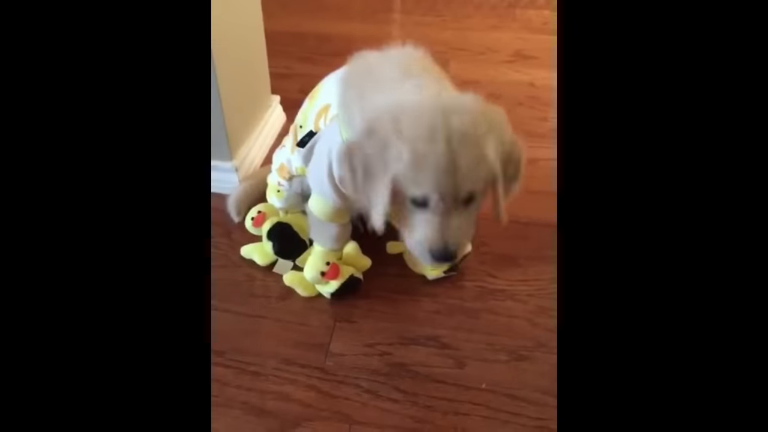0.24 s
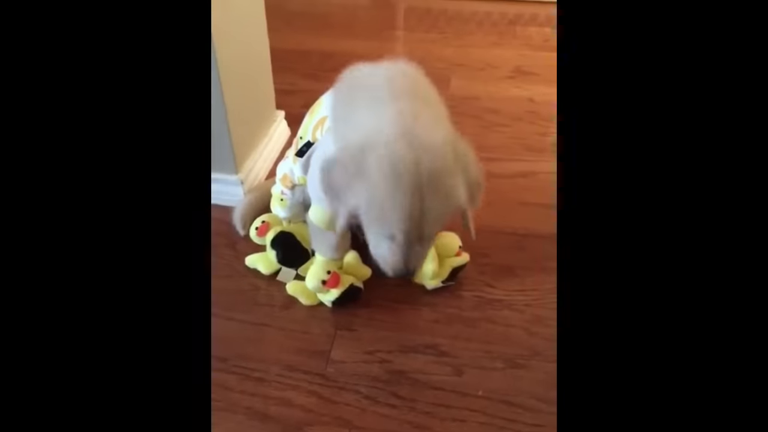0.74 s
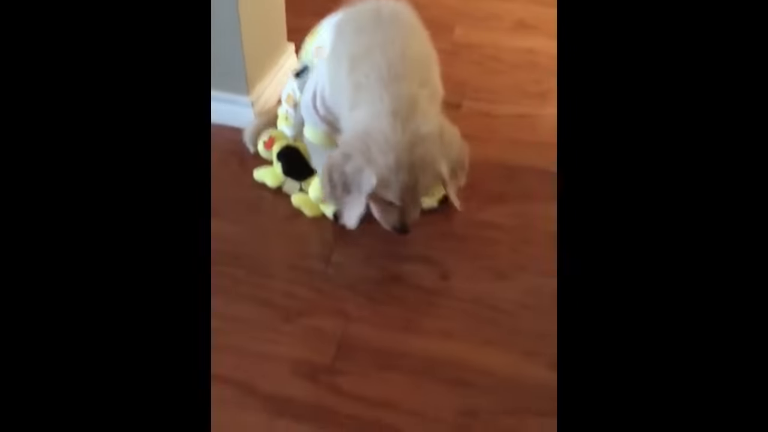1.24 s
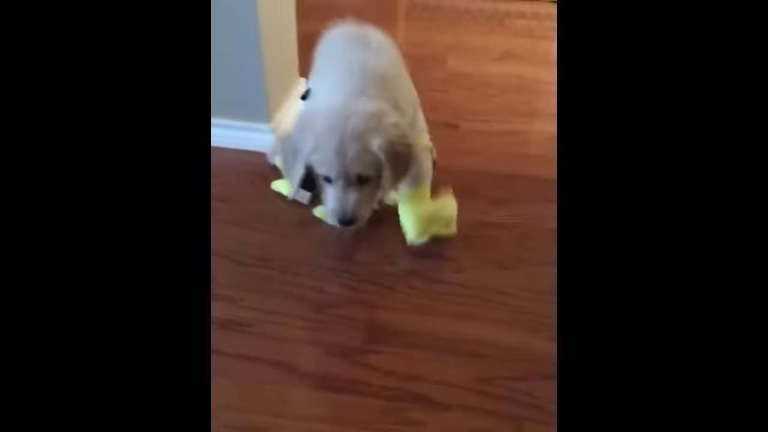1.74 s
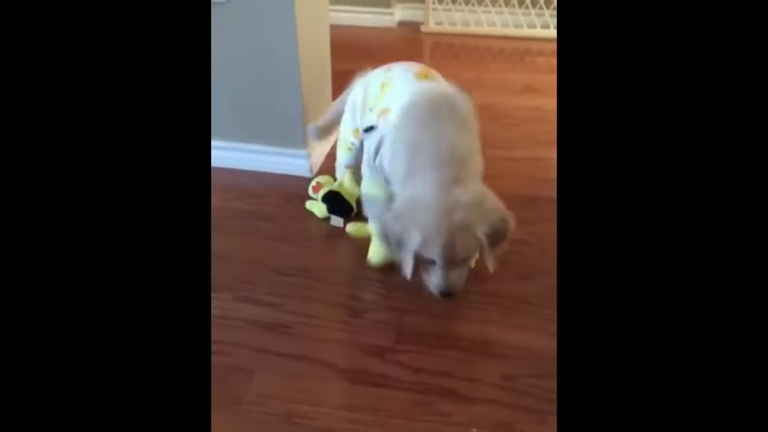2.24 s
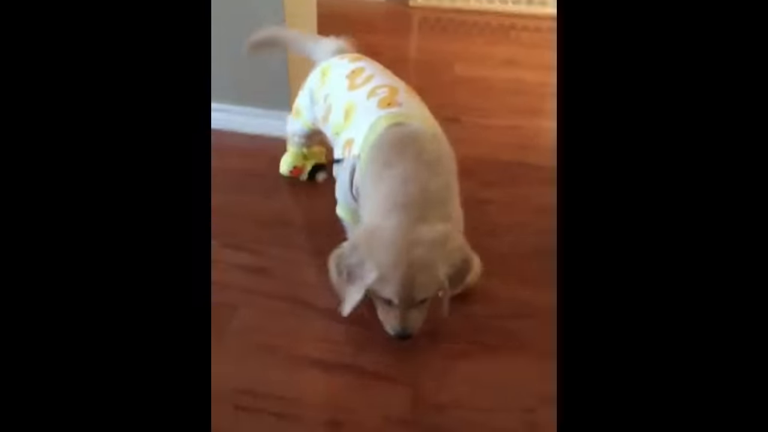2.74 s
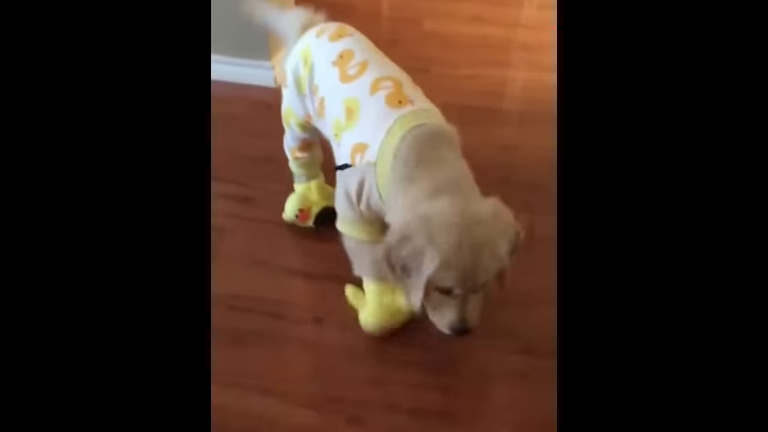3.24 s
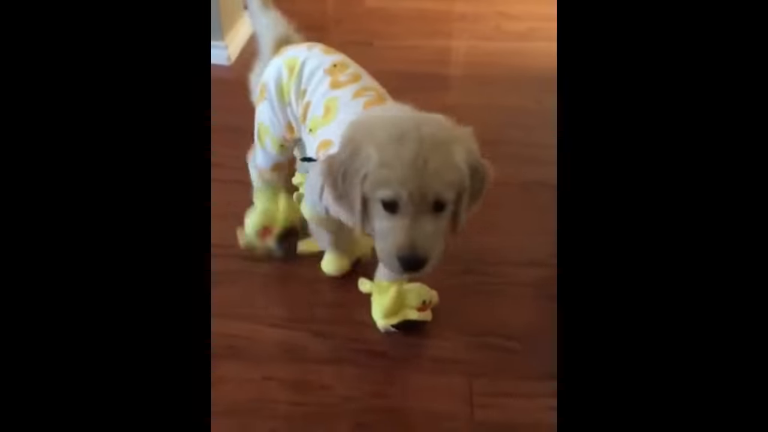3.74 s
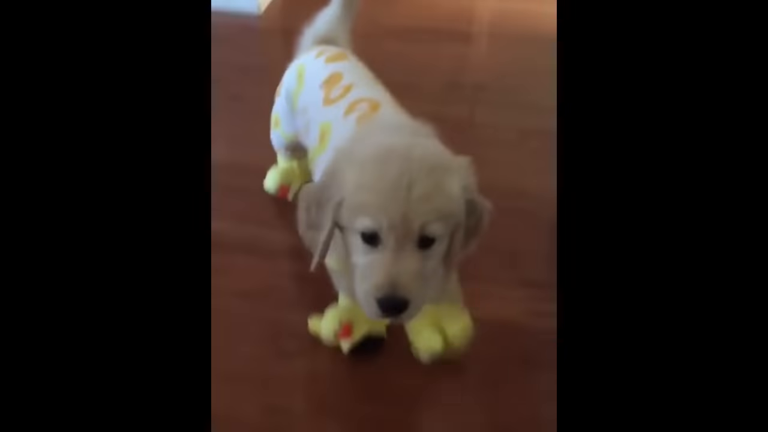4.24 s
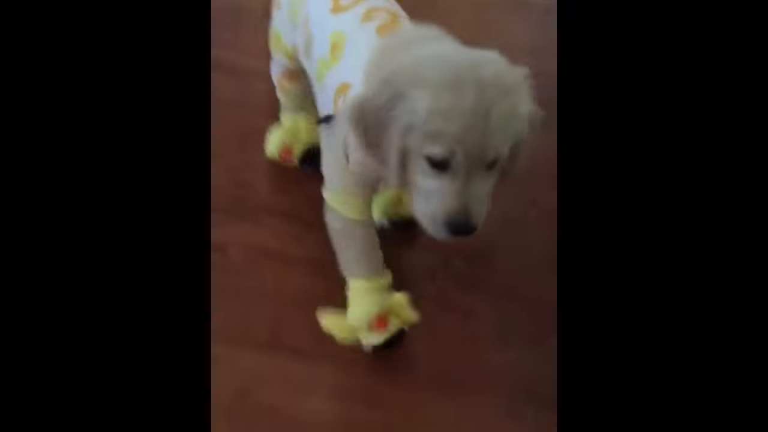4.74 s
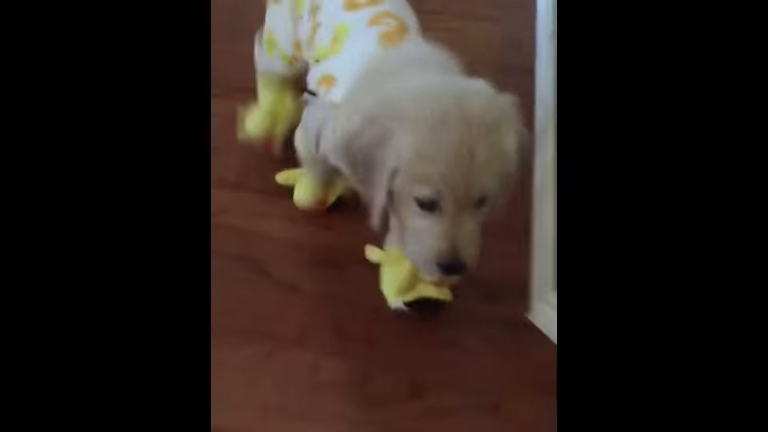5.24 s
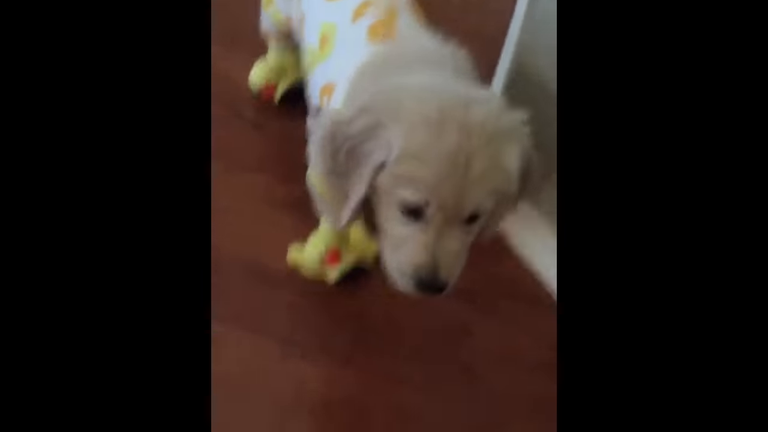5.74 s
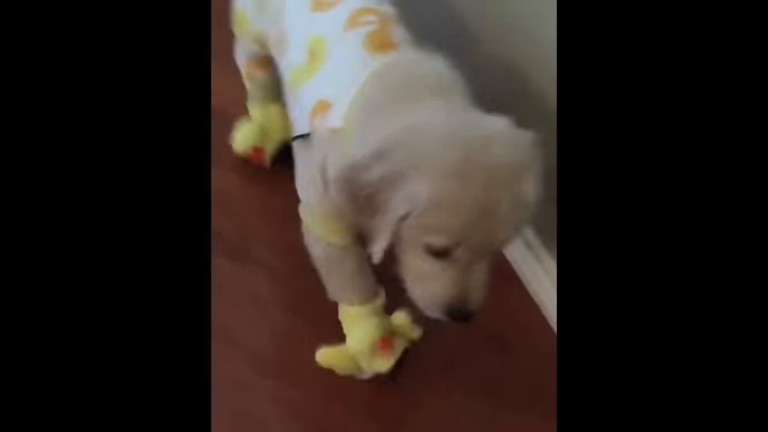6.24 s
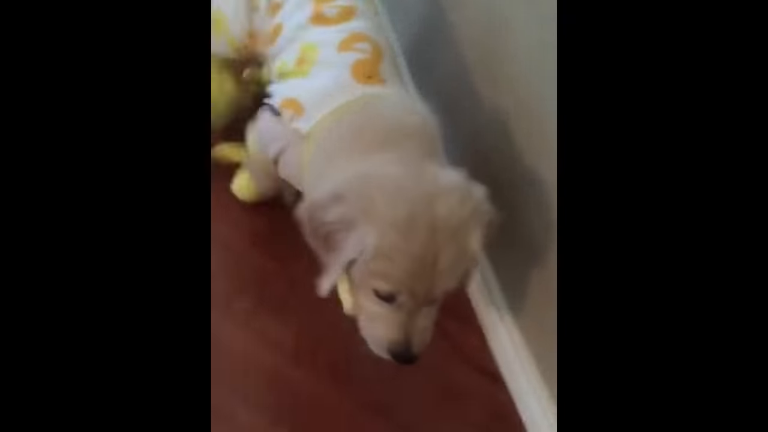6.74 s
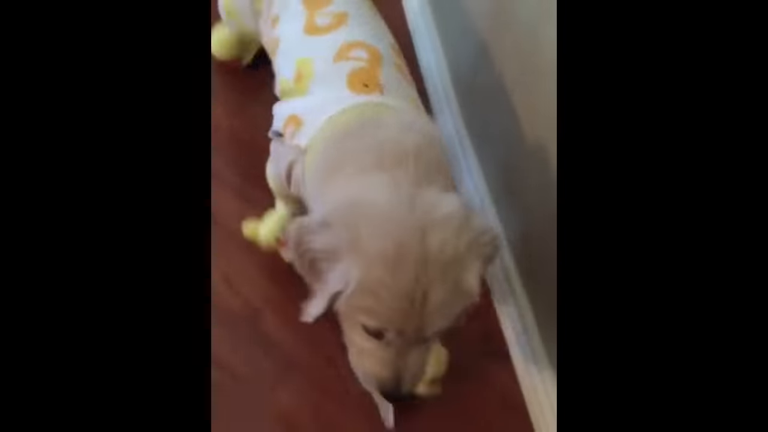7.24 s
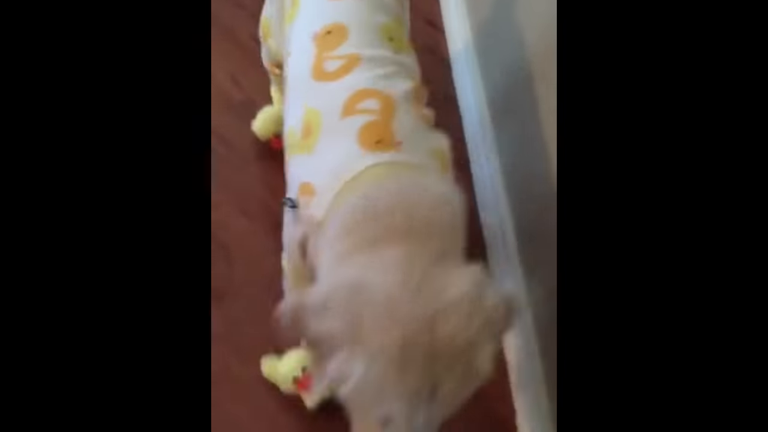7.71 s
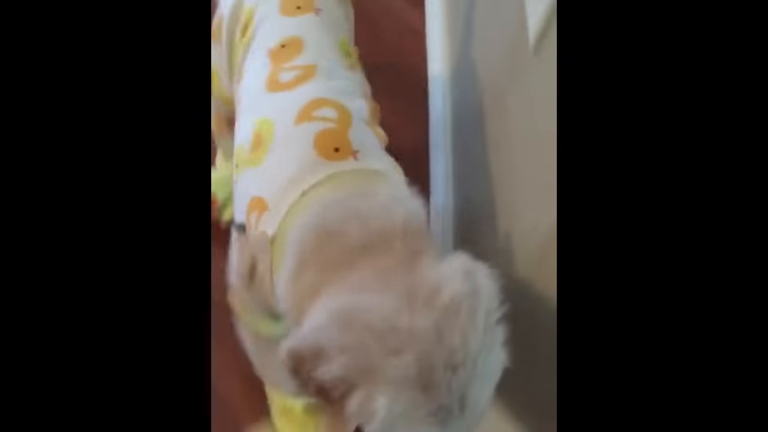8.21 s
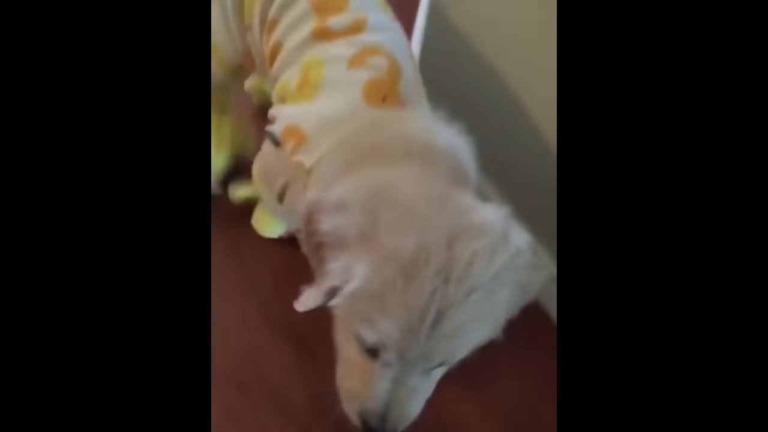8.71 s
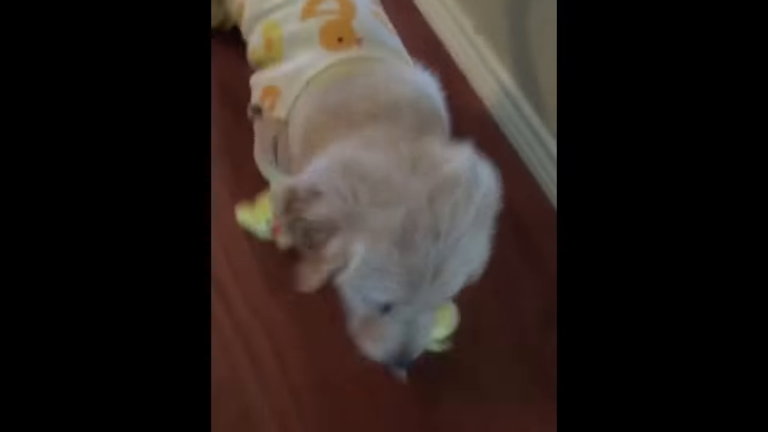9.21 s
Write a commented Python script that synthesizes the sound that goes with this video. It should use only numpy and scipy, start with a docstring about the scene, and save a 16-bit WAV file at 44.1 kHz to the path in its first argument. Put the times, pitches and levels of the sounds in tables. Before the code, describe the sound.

Six sharp smacks close by, a dog barking in two pairs from an echoing next room, soft cloth puppy steps on wood, low hum.

```python
"""A hallway with a wooden floor: a puppy in plush slippers pads close to a phone, and its suit rustles nearer.
Cloth soles are rubbed noise with knocks, ticks and squeaks; six sharp smacks nearby are bursts of tiny snaps.
A dog barks in two pairs from a bare, echoing room next door: hoarse folds drive a resonant throat.
An appliance hums on two wavering lines over rumble and faint hiss."""
import sys
import numpy as np
from scipy import signal
from scipy.fft import rfft, irfft
from scipy.io import wavfile
from scipy.ndimage import uniform_filter1d

SR = 44100
rng = np.random.default_rng(int(sys.argv[2]) if len(sys.argv) > 2 else 0)


def materialize(psi):
    """Save the field psi as 16-bit PCM at rate SR to the path in sys.argv[1].

    A 1-D psi becomes a single channel; in a 2-D psi each row is a channel.
    """
    bounded = np.clip(np.atleast_2d(psi).T, -1, 1)
    quanta = np.round(bounded * 32767).astype(np.int16)
    wavfile.write(sys.argv[1], SR, quanta)


N = 417627
T = np.arange(N) / SR


def undb(db):
    """Decibels to gain."""
    return 10 ** (np.asarray(db) / 20)


def unit(x):
    """Scale to rms 1."""
    return x / np.sqrt(np.mean(x ** 2) + 1e-20)


def steady(x):
    """Hold the rms near 1 over a sliding 20 ms."""
    return x / np.sqrt(np.abs(uniform_filter1d(x ** 2, SR // 50)) + 1e-12)


def add(out, s, x):
    """Mix x into out from time s."""
    i = max(int(s * SR), 0)
    out[i:i + len(x)] += x[:len(out) - i]


def curve(points):
    """Join (time [s], value) points by straight lines."""
    return np.interp(T, *np.transpose(points))


def colour(x, points, tilt_db=0):
    """Filter by a (frequency [Hz], level [dB]) spectrum, tilted per octave above 1024 Hz."""
    hz, db = np.transpose(points)
    octave = np.log2(np.maximum(np.fft.rfftfreq(len(x), 1 / SR), 10))
    shape = np.interp(octave, np.log2(hz), db) + tilt_db * np.maximum(octave - 10, 0)
    return irfft(rfft(x) * undb(shape), len(x))


def resonate(x, hz, width):
    """One resonance, gain 1 at its centre."""
    return signal.lfilter(*signal.iirpeak(min(hz, SR / 2 - 2000), hz / width, fs=SR), x)


def cut(x, hz, kind, order=2):
    """Low-pass or high-pass."""
    return signal.sosfilt(signal.butter(order, hz, kind, fs=SR, output="sos"), x)


def walk(rate, size):
    """Smooth chance with a spread near 1."""
    k = max(int(SR / rate), 1)
    steps = np.repeat(rng.standard_normal(size // k + 2), k)
    return uniform_filter1d(steps, k)[:size] * np.sqrt(3 / 2)


def grains(size, spread_db):
    """Noise made of many tiny clicks of uneven strength."""
    return rng.standard_normal(size) * undb(spread_db * walk(1500, size))


def knock(hz):
    """A soft blow rings one low, damped mode."""
    t = T[:8192]
    return np.sin(2 * np.pi * hz * t) * np.minimum(t / 0.00365, 1) * np.exp(-t / 0.02)


def room(x, t60_low, t60_high, early_db, early_s, split_hz):
    """Diffuse echo of unit energy: strong first reflections, then a tail with its own decay above the split."""
    t = T[:SR]
    noise = rng.standard_normal(SR)
    low = irfft(rfft(noise) / (1 + (np.fft.rfftfreq(SR, 1 / SR) / split_hz) ** 4), SR)
    high = noise - low
    tail = low * undb(-60 * t / t60_low) + high * undb(-60 * t / t60_high)
    tail *= (1 + undb(early_db) * np.exp(-t / early_s)) * np.minimum(t / 0.0031, 1)
    return signal.fftconvolve(x, tail / np.linalg.norm(tail))[:len(x)]


# hum lines heard as the phone moves through the room, before the trims: (time [s], level [dB])
MOTOR_LEVEL = [(0.0, -63), (2.21, -57.5), (2.66, -67.5), (2.82, -57), (3.63, -51.5), (6.55, -47.5),
               (6.91, -45), (7.34, -44.5), (7.7, -57.5), (8.1, -47.5), (8.38, -65), (8.66, -43.5),
               (9.11, -58.5), (9.47, -43.5)]
MAINS_LEVEL = [(0.0, -43.5), (0.56, -50), (2.21, -46.5), (3.57, -43.5), (5.24, -46.5), (6.18, -56.5),
               (6.33, -88.5), (6.51, -57), (6.97, -52.5), (7.35, -44.5), (8.76, -47.5), (8.97, -60),
               (9.27, -43), (9.47, -49.5)]
# the rumble's rise and fall, before its trim: (time [s], level [dB])
RUMBLE_LEVEL = [(0.0, -56.5), (2.78, -54), (3.77, -52), (4.19, -53.5), (4.8, -48), (5.16, -52.5),
                (5.36, -51.5), (9.47, -49.5)]
# spectra of the rumble and of the faint hiss: (frequency [Hz], level [dB])
RUMBLE_COLOUR = [(15, -19), (28, -21.5), (38, -8), (48, -11), (70, 1), (90, 1), (112, 1.5), (135, -5.5),
                 (170, -14), (220, -22), (300, -34), (500, -55.5)]
HISS_COLOUR = [(150, -25.5), (250, 0.5), (322, -1), (368, -2.5), (561, -7.5), (773, -10), (995, -11),
               (1820, -14.5), (8590, -21.5), (12700, -24), (14000, -30.5)]
MOTOR_HZ, MAINS_HZ = 54.1, 118.9
MOTOR_TRIM_DB, MAINS_TRIM_DB, RUMBLE_TRIM_DB, HISS_DB = 0.1, -1.6, 3.0, -68.5


def appliance():
    """A motor line and a mains line waver in phase and level over a low rumble and faint hiss."""
    motor = unit(np.sin(2 * np.pi * MOTOR_HZ * T + .4 * walk(7.8, N)))
    motor *= undb(curve(MOTOR_LEVEL) + MOTOR_TRIM_DB + 1.1 * walk(6, N))
    mains = unit(np.sin(2 * np.pi * MAINS_HZ * T + 0.18 * walk(5.8, N)))
    mains *= undb(curve(MAINS_LEVEL) + MAINS_TRIM_DB + 1.1 * walk(6.5, N))
    rumble = unit(cut(colour(rng.standard_normal(N), RUMBLE_COLOUR), 820, "low"))
    rumble *= undb(curve(RUMBLE_LEVEL) + RUMBLE_TRIM_DB + walk(2.4, N))
    hiss = unit(cut(colour(rng.standard_normal(N), HISS_COLOUR), 250, "high"))
    hiss *= undb(HISS_DB + .5 * walk(2, N))
    return motor + mains + rumble + hiss


# rustle of the suit as the puppy comes nearer the phone: (time [s], level [dB])
RUSTLE_LEVEL = [(1.5, -80), (2.6, -77.5), (4.5, -73.5), (7, -73.5), (9.4, -66.5)]
# spectrum of rubbing cloth, shared with the soles: (frequency [Hz], level [dB])
CLOTH_COLOUR = [(200, -4.5), (450, -6), (900, -3), (2000, 3), (3200, 1.5), (5000, -2.5), (7500, -2.5),
                (10500, -4.5), (13500, -7)]


def rustle():
    """Cloth rubs in uneven grains; narrow bands of it come and go by themselves."""
    cloth = colour(grains(N, 5.4) * undb(6.6 * np.tanh(walk(8.6, N))), CLOTH_COLOUR)
    bands = np.zeros(N)
    for hz in np.geomspace(600, 12000, num=24):
        bands += resonate(cloth, hz, hz / 16) * undb(14 * np.tanh(walk(28, N) / 2))
    return unit(bands) * undb(curve(RUSTLE_LEVEL))


# sharp smacks near the phone: (time [s], level [dB], length [s], cavity pitch [Hz], rise [s],
# treble tilt [dB per octave], trailing hiss [dB], low thump [dB])
SMACKS = [(0.069, -36.5, 0.025, 2900, 0.021, -1, -48, -43.5),
          (0.229, -34.5, 0.018, 3230, 0.0157, -1.5, -41.5, -51),
          (.408, -28.5, 0.0067, 3280, 0.007, 0, -46, -64),
          (0.576, -32.5, 0.0093, 3200, 0.0066, 1.5, -68, -46),
          (0.723, -34, .0063, 3800, 0.0031, -.5, -50, -50.5),
          (0.894, -28.5, 0.0098, 3340, 0.0063, 0.4, -51, -57)]
# spectrum of the snaps: (frequency [Hz], level [dB])
SMACK_COLOUR = [(200, -9), (800, -10), (1500, -6.5), (2400, -1.5), (4200, -7), (5600, -5.5), (7000, -7.5),
                (10500, -10.5), (13500, -12.5)]


def smacks():
    """Each smack is a brief, swelling burst of tiny snaps ringing a small cavity."""
    out, t = np.zeros(N), T[:4096]
    for s, db, length, hz, rise, tilt_db, _, _ in SMACKS:
        swell = np.minimum(t / rise, 1) ** 2 * np.exp(-np.maximum(t - length, 0) / .0025)
        burst = colour(grains(len(t), 5.4) * swell, SMACK_COLOUR, tilt_db)
        burst += 2.66 * resonate(burst, hz, 1200)
        add(out, s, undb(db) * burst * np.sqrt(length * SR) / np.linalg.norm(burst))
    return out


HISS_RISE_S, HISS_DECAY_S, THUMP_HZ = 0.014, 0.041, 345


def smack_tails():
    """A dull thump, and a thin, high hiss that swells around the end of each smack and fades after it."""
    out, t = np.zeros(N), T[:16384]
    fade = np.minimum(t / HISS_RISE_S, 1) ** 2 * np.exp(-np.maximum(t - HISS_RISE_S, 0) / HISS_DECAY_S)
    for s, _, length, _, rise, _, hiss_db, thump_db in SMACKS:
        hiss = unit(cut(grains(len(t), 1.5), 7500, "high")) * fade
        add(out, s + length - HISS_RISE_S / 2, undb(hiss_db) * hiss)
        add(out, s + rise, undb(thump_db) * knock(THUMP_HZ))
    return out


# throat resonances above the lowest: (frequency [Hz], width [Hz], level [dB])
THROAT = [(861, 220, -14), (1159, 55, 4.5), (1600, 75, -3), (2080, 660, -17)]
CREST_HZ, SAG_HZ_PER_S = 642.5, 600  # every bark glides to the same pitch, then sags
BARK_ATTACK_S, BARK_SWELL_S, BARK_RELEASE_S = 0.021, 0.061, 0.018
# the mouth narrows just before the crest; afterwards the low note fades in the room
# and the upper resonances stand out again
MOUTH_CLOSE_S, MOUTH_CLOSED_DB, LOW_NOTE_FADE_DB_PER_S = 0.037, -7, 157.5
MOUTH_OPEN_S, MOUTH_OPEN_DB = 0.04, 8.5  # it widens by this much as the bark begins


def bark(length, db, swell_db, crest_s, start_hz, open_db, start_rough, crest_rough, overtone_db):
    """Hoarse, jittering folds drive the throat; the open mouth favours its upper resonances up to the crest."""
    t = T[:SR]
    effort, after = np.minimum(t / crest_s, 1), np.clip(t - crest_s, 0, crest_s)
    hz = start_hz + (CREST_HZ - start_hz) * effort ** 1.15 - SAG_HZ_PER_S * after
    # level of the upper resonances against the lowest
    upper_db = np.interp(t, [crest_s - MOUTH_CLOSE_S, crest_s], [open_db, MOUTH_CLOSED_DB])
    upper_db += LOW_NOTE_FADE_DB_PER_S * after - MOUTH_OPEN_DB * np.maximum(1 - t / MOUTH_OPEN_S, 0)

    rough = np.clip(start_rough + (crest_rough - start_rough) * effort ** 2, 0, 1)
    jitter = 0.0969 * rough * walk(350, SR) + .012 * walk(107.8, SR)
    phase = 2 * np.pi * np.cumsum(hz * (1 + jitter)) / SR
    folds = unit(sum(np.cos(k * phase) for k in np.arange(1, 8)))
    rasp = unit(cut(rng.standard_normal(SR), 6000, "low") * (1 + 0.33 * np.cos(phase)))
    source = np.sqrt(1 - rough) * folds + rough * rasp

    # a higher bark has a higher lowest resonance
    low = resonate(source, np.max(hz) / 2 + 325, 120)
    low = cut(cut(low, 900, "low"), 455, "high", order=6)
    breathy = source + 0.53 * rough * rasp
    high = np.zeros(SR)
    for k, (centre, width, gain_db) in enumerate(THROAT):
        high += (-1) ** k * undb(gain_db) * resonate(breathy, centre, width)
    high = cut(high, 800, "high")
    voice = cut(steady(low) + undb(upper_db) * steady(high), 260, "high", order=4)

    # the doorway and walls take away nearly all the treble
    treble = undb(overtone_db) * cut(voice, 2000, "high", order=5)
    voice = cut(voice, 2160, "low", order=18) + treble
    swell = undb(db - swell_db * np.maximum(1 - t / BARK_SWELL_S, 0))
    release = np.exp(-np.maximum(t - length, 0) / BARK_RELEASE_S)
    voice = steady(voice) * swell * np.minimum(t / BARK_ATTACK_S, 1) * release
    heard = undb(-1.5) * voice + room(voice, 0.81, 0.58, 7.1, 0.014, 2000)
    return heard * np.linalg.norm(voice) / np.linalg.norm(heard)


# barks from the room next door: (time [s], length [s], level [dB], swell [dB], time to the crest [s],
# starting pitch [Hz], mouth opening [dB], roughness at the start [0-1], roughness at the crest [0-1],
# treble through the doorway [dB])
BARKS = [(.503, 0.13, -19.5, 12, .098, 438.9, 11.5, 0.73, .05, -21),
         (1.156, 0.095, -18.5, 13.5, 0.099, 460.2, 13.5, 0.7, 0.26, -15.5),
         (8.139, 0.1, -20.5, 7.5, .1, 764.6, 1, .55, .45, -31),
         (8.619, 0.13, -25.5, 11.5, .112, 445, 6.5, 0.84, 0.68, -47)]


def barking():
    """All barks, each with the echo of the far room."""
    out = np.zeros(N)
    for s, *shape in BARKS:
        add(out, s, bark(*shape))
    return out


def scuff(length, tilt_db):
    """A cloth sole catches and slips over the boards, with passing resonances of its own."""
    t = T[:16384]
    slide = np.minimum(t / (0.25 * length), 1) * np.exp(-np.maximum(t - length, 0) / 0.014)
    catch = undb(1.8 * walk(121, len(t)))
    rub = colour(grains(len(t), 3.4) * slide * catch, CLOTH_COLOUR, tilt_db)
    rub += 1.27 * sum(resonate(rub, hz, 310) for hz in rng.uniform(1640, 8650, size=5))
    return rub * np.sqrt(length * SR) / np.linalg.norm(rub)


def squeak(hz, length):
    """A sole sticks and slips fast enough to give a short, wavering tone."""
    t = T[:int(length * SR)]
    phase = 2 * np.pi * np.cumsum(hz * (1 + 0.026 * walk(490, len(t)))) / SR
    return unit(np.sin(phase) * np.sin(np.pi * t / length))


def tick(hz):
    """A small hard tap on the floor: a crack with a very short ring, peaking at -2.5 dB."""
    t = T[:1024]
    crack = rng.standard_normal(len(t)) * np.minimum(t / 0.0014, 1) * np.exp(-t / 0.0021)
    crack = cut(crack, 1100, "high")
    tap = crack + 3.7 * resonate(crack, hz, 680.0)
    return undb(-2.5) * tap / np.abs(tap).max()


# clear steps close to the phone, a sole sliding on the boards:
# (time [s], level [dB], length [s], treble tilt [dB per octave])
SCUFFS = [(1.163, -64.5, 0.15, 3), (1.721, -60.5, 0.067, 2.5), (2.091, -61, 0.064, 2),
          (2.832, -48, 0.031, 2), (2.881, -62.5, .14, 5), (3.092, -59, .07, 7.5),
          (3.254, -47.5, 0.036, -0.1), (3.704, -57.5, 0.059, 3), (3.867, -54, 0.031, 11),
          (4.333, -53.5, 0.028, 4.5), (4.896, -58.5, 0.071, 2.5), (5.327, -49.5, 0.052, 2),
          (5.855, -56, .026, 2), (6.195, -61.5, 0.2, 2), (6.61, -55, 0.013, 2.5), (6.893, -57.5, .091, 8),
          (7.164, -61.5, 0.062, 5.5), (7.265, -54.5, 0.049, 0), (7.389, -59.5, 0.1, 3),
          (7.932, -60.5, 0.066, 0), (8.126, -66, 0.13, 1), (8.655, -65.5, 0.097, -2),
          (9.226, -58.5, 0.058, 1), (9.407, -63.5, 0.041, 2)]
# clear ticks of the steps, each begun 1 ms early: (time [s], gain on the tick [dB], ring pitch [Hz])
TICKS = [(3.2141, -35.5, 3760), (3.73, -30.5, 5360), (3.8543, -43.5, 2840), (3.897, -33.5, 7000),
         (5.0825, -33.5, 4180), (6.164, -37, 3020), (6.9255, -37.5, 6580), (7.0497, -41.5, 7300),
         (7.581, -48, 7040), (7.8338, -31.5, 3150), (7.8496, -36, 3630), (8.587, -33.5, 2670)]
# soles squeaking briefly on the varnish: (time [s], pitch [Hz], level [dB], length [s])
SQUEAKS = [(1.982, 1500, -73, .057), (3.871, 2950, -66, .024), (4.63, 2890, -69, 0.028),
           (4.936, 2070, -69, 0.042), (5.005, 2800, -66.5, 0.048), (5.25, 2040, -64.5, 0.07),
           (7.576, 7150, -61, 0.011), (8.115, 7150, -63, 0.019)]
# the paw lands just after the sole touches; level relative to the scuff
KNOCK_DB, KNOCK_LAG_S, BOARD_HZ = -10.5, 0.029, (400, 622)


def footsteps():
    """Each clear step scuffs, then knocks a floorboard; now and then a sole ticks or squeaks."""
    out = np.zeros(N)
    for s, db, length, tilt_db in SCUFFS:
        add(out, s, undb(db) * scuff(length, tilt_db))
        add(out, s + KNOCK_LAG_S, undb(db + KNOCK_DB) * knock(rng.uniform(*BOARD_HZ)))
    for s, db, hz in TICKS:
        add(out, s - .001, undb(db) * tick(hz))
    for s, hz, db, length in SQUEAKS:
        add(out, s, undb(db) * squeak(hz, length))
    return out


SHUFFLE_FROM_S, SHUFFLE_GAP_S = 4.1, .3  # faint shuffles between the steps, once the puppy is close
SHUFFLE_DB, SHUFFLE_S, SHUFFLE_TILT_DB, SHUFFLE_SPREAD_DB = -63.5, 0.031, 5, 1.5
SHUFFLE_TICK_GAIN_DB, SHUFFLE_SQUEAK_DB, SHUFFLE_HZ = -52, -78, (2160, 3830)


def shuffles():
    """The other paws shuffle at an uneven pace: a faint scuff, a tick within it and a trace of a squeak."""
    out = np.zeros(N)
    for beat in np.arange(SHUFFLE_FROM_S, T[-1] - 2 * SHUFFLE_GAP_S, SHUFFLE_GAP_S):
        s = beat + SHUFFLE_GAP_S * rng.random()
        gain = undb(SHUFFLE_SPREAD_DB * rng.standard_normal())
        tap = undb(SHUFFLE_TICK_GAIN_DB) * tick(rng.uniform(*SHUFFLE_HZ))
        tone = undb(SHUFFLE_SQUEAK_DB) * squeak(rng.uniform(*SHUFFLE_HZ), SHUFFLE_S)
        add(out, s, gain * undb(SHUFFLE_DB) * scuff(SHUFFLE_S, SHUFFLE_TILT_DB))
        add(out, s + SHUFFLE_S * rng.random(), gain * tap)
        add(out, s + SHUFFLE_S, gain * tone)
    return out


def scene():
    """Near sounds with the hallway's echo, the far barks and the hum."""
    sharp = smacks()
    steps = footsteps() + shuffles() + rustle()
    sharp_echo = undb(-3.0) * room(cut(sharp, 13000, "low", order=1), 0.6, 0.42, 0.67, 0.023, 5500)
    step_echo = undb(-5.0) * room(steps, 0.51, .45, 0.91, .02, 5500)
    near = sharp + smack_tails() + steps + sharp_echo + step_echo
    return (near + barking() + appliance())[None]


def record(dry):
    """The phone cuts the top steeply above 14.1 kHz."""
    return signal.sosfilt(signal.ellip(10, .2, 70, 14100, fs=SR, output="sos"), dry)


dry = scene()
out = record(dry)
materialize(out)
```